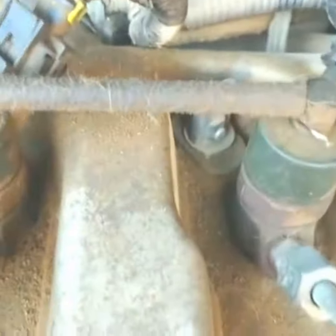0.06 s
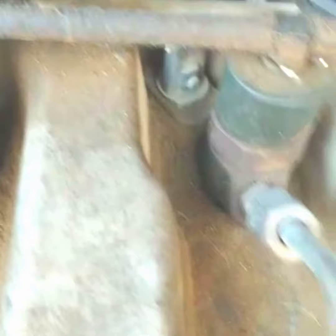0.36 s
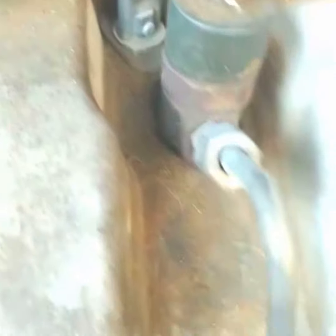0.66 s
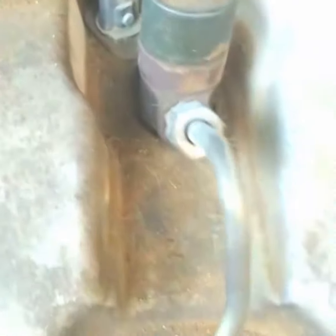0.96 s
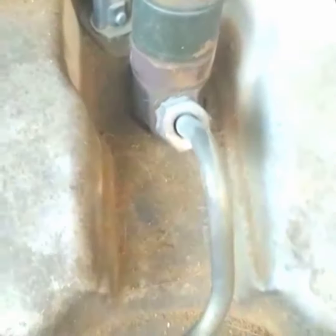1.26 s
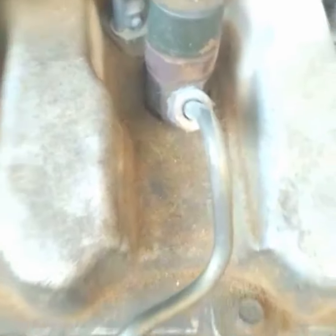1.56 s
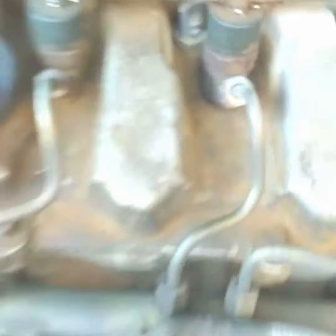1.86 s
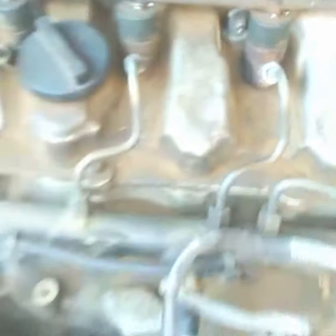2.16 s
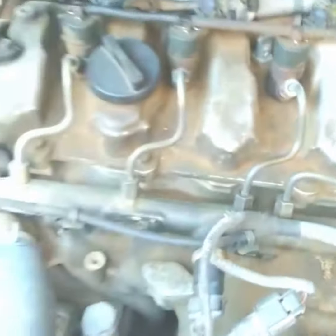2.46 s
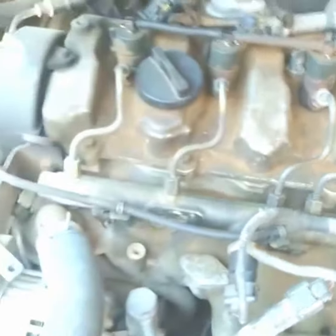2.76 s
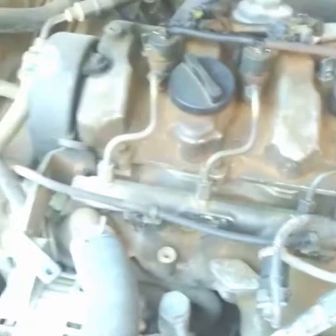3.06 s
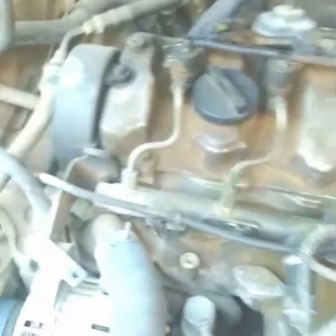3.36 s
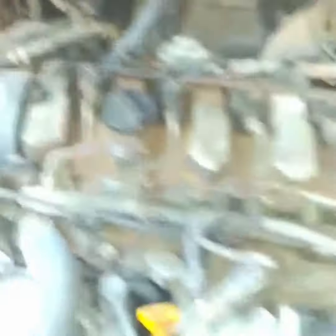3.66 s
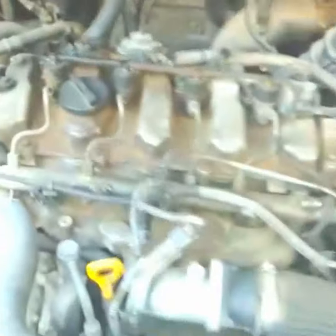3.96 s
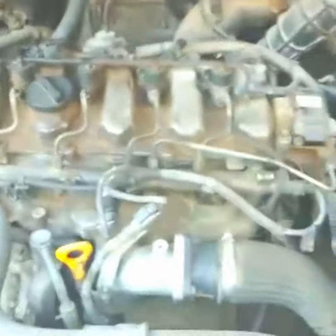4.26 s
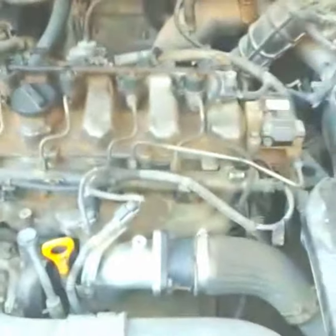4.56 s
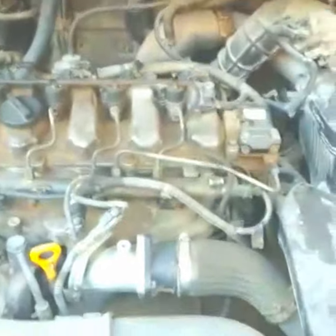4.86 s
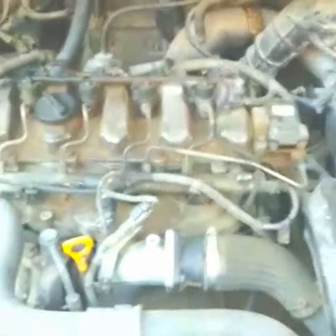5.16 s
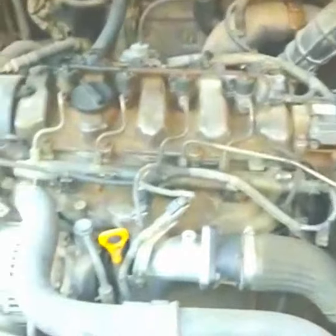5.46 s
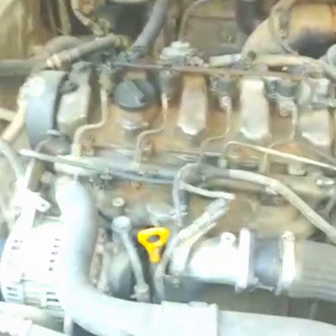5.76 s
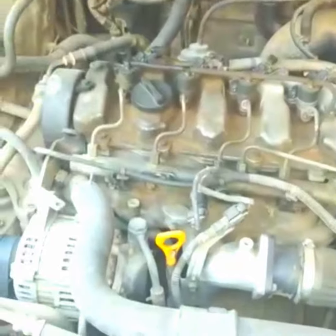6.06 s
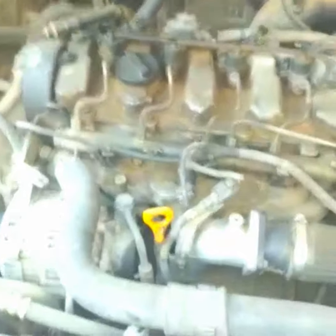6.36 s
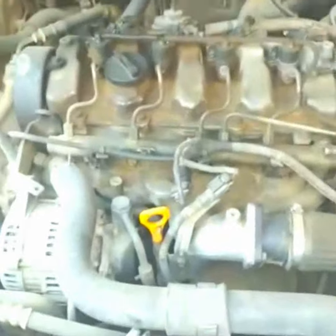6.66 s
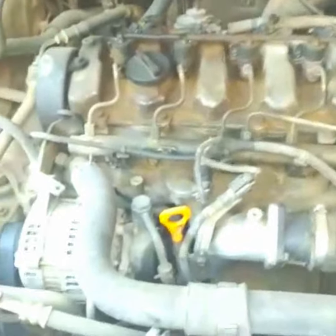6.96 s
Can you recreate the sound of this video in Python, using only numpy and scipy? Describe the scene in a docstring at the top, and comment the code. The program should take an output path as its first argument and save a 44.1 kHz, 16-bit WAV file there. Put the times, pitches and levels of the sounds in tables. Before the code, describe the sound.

A diesel car engine idles with a sharp, regular tapping knock, very close at first and then a little farther away.

```python
"""A four-cylinder diesel idles under an open bonnet, one cylinder knocking sharply once per cycle.
At first the microphone is right beside an injector, and the knocks overload it with low thumps.
After about two seconds it backs away: the thumps stop, and a little later two thin whistles fade.
From about five seconds on the knock is heard from afar. All along, the other three cylinders fire
between the knocks with a soft clatter, over the whirr of belts and gears and a low drone."""
import sys
import numpy as np
from scipy import signal
from scipy.io import wavfile
from scipy.ndimage import map_coordinates

SR = 44100
rng = np.random.default_rng(int(sys.argv[2]) if len(sys.argv) > 2 else 0)


def pcm_store(signal):
    """Save signal as 16-bit PCM."""
    levels = np.round(np.clip(np.atleast_2d(signal), -1, 1) * 32767)
    wavfile.write(sys.argv[1], SR, levels.astype(np.int16).T)


N = 308700
T = np.arange(N) / SR
FIRST_KNOCK_S, CYCLE_S = 0.0519, 0.153786   # one knock every two turns of the crank
# The bands in which the engine rings: octaves in the bass, thirds of an octave above.
BAND_EDGES_HZ = np.concatenate([[22, 45, 90], np.geomspace(180, 14400, 20)])

# The microphone's path. Each row: time in seconds, closeness to the cylinder head (0 far, 1 near).
CLOSENESS = [(.9, 0.91), (1.6, 0.87), (2.1, 0.65), (2.6, 0.32), (3.9, 0.25), (4.3, 0.09), (5.3, 0)]
# The four firings of a cycle. Each row: delay after the knock in seconds, strength in dB.
FIRINGS = [(-.003, 1), (0.0389, 1), (0.078, 0), (0.1133, 1)]
# The engine's tone colour. Each row: frequency in Hz, base levels of knock, clatter and whirr in dB,
# seconds for the ringing to fall by 60 dB.
ENGINE_SPECTRUM = [(29.6, -80, -71, -64.5, 0.2), (88.5, -65, -80, -80, 0.12), (183, -68.5, -60, -71, 0.21),
                   (280, -69, -90, -78, 0.09), (460, -70.5, -80.5, -77, 0.19), (827, -60, -67.5, -83, 0.15),
                   (1180, -59, -66.5, -90, 0.12), (1620, -55.5, -70.5, -86, 0.089),
                   (2330, -59, -74, -88.5, 0.091), (3290, -64, -75, -84, 0.066),
                   (5390, -48.5, -69, -82, 0.041), (8400, -42.5, -69.5, -80.5, 0.032),
                   (9470, -48.5, -78, -88, 0.031), (13900, -58.5, -78, -87, 0.023)]
# Extra level next to the head. Each row: frequency in Hz, dB for the knock, dB for clatter and whirr.
NEAR_BOOST = [(39.97, 8.5, 10), (189, 6, 4), (406, 9, 9.5), (890, 0.5, 2), (1730, 1.5, 10),
              (3570, 5.5, 9.5), (7430, -3, 7), (13100, 0.5, 11.5)]
# How much of the vibration is new in each cycle. Each row: frequency in Hz, share from 0 to 1.
FRESH_SHARE = [(40, 1), (90, 1), (180, 0.1), (600, 0.21), (1800, 0.09), (3500, 0.48), (8000, 0.91)]
# How wide the engine sounds. Each row: frequency in Hz, side (ear difference) minus mid (shared) in dB.
STEREO_WIDTH = [(60, -15), (110, -13), (200, -4.5), (380, -8.5), (700, -2.5), (1290, -2.5), (2380, -1),
                (4400, 1), (8120, 0), (15000, -1)]
# The balance between the ears. Each row: frequency in Hz, left minus right in dB.
BALANCE = [(60, -2), (400, 1), (1300, -2), (3000, 1), (6000, 0), (8200, 2), (10000, 7.5), (13000, 9.5)]
# The notes at which block, cover and injector ring. Each row: pitch in Hz, width in Hz,
# boost from afar in dB, boost next to the head in dB.
RESONANCES = [(282.5, 33, 11, -1.5), (318, 15, 2, 6.5), (401, 44, 0.5, 6), (476, 56, 3.5, 4.5),
              (665, 24, 7, 2.5), (820, 51, 2.5, 3.5), (914.4, 40, 4, 11.5), (1210, 15, 6.5, 5.5),
              (1473, 32, 7.5, 5), (1626, 32, 6, 5), (1765, 117, 11, 7.5), (1837, 58, -0.5, 3),
              (2347, 45, 10, 6), (2580, 63, 11, 4), (3368, 68, 11.5, 8.5), (5384, 103, -2.5, 3),
              (6154, 420, 3, 5.5), (8590, 1800, 5.5, 7.5)]
# Tones of block and intake that swell once a cycle. Each row: pitch in Hz, peak after the knock in
# seconds, half length in seconds, level from afar in dB, level next to the head in dB.
THROBS = [(179.5, 0.044, 0.032, -39.5, -39), (161.5, 0.0021, .017, -43, -39),
          (286, 0.01205, 0.018, -48, -54), (314, .025, 0.026, -66, -38), (415, 0.1, 0.011, -56, -40.5),
          (669, .028, 0.031, -48.5, -68)]
# The steady hum. Each row: multiple of the firing rate, level from afar in dB.
DRONE = [(1, -44), (2, -45), (4, -54)]
# Thin whistles over the injectors. Each row: pitch in Hz, width in Hz, base level in dB.
WHISTLES = [(11950, 220, -50), (12680, 160, -46.5)]
# How the whistles rise and fade. Each row: time in seconds, dB added to the base level.
WHISTLE_GAIN = [(.8, -16), (1.1, -6), (2.1, -1), (2.9, -8), (3.3, 1), (3.7, -12), (7, -13)]


def knock_blows(far_db, near_gain_db, scatter_db):
    """One blow per cycle, louder the nearer the microphone. Gives times and strengths in dB."""
    times = cycle_starts()
    scatter = scatter_db * rng.standard_normal(len(times))
    return times, far_db + near_gain_db * closeness_at(times) + scatter


def firing_energy(scatter_db):
    """Fuel burns in four bursts a cycle, each a little different in strength."""
    delay_s, level_db = np.transpose(FIRINGS)
    times = cycle_starts()[:, None] + delay_s
    strength = from_db(level_db + scatter_db * rng.standard_normal(times.shape))
    return impulses(times.ravel(), strength.ravel() ** 2)


def knock_clatter_and_whirr(blows, closeness, knock_rise_periods, firing_rise_s, bay_db, bay_stretch,
                            standing_wave_db, echo_s, echo_db):
    """Blows set the metal ringing over a steady whirr; a knock's low notes build later and last longer."""
    times, strength_db = blows
    knocks = impulses(times, from_db(strength_db) ** 2)
    knocks += impulses(times + echo_s, from_db(strength_db + echo_db) ** 2)   # echo off the bonnet
    firings = firing_energy(scatter_db=1.53)
    # Neighbouring bands take turns between two sets of noise.
    repeating = [repeating_noise(closeness, turns=0.66) for _ in range(2)]
    fresh = rng.standard_normal((2, 2, N))
    out = np.zeros((2, N))
    for k, (low, high) in enumerate(zip(BAND_EDGES_HZ, BAND_EDGES_HZ[1:])):
        hz = np.sqrt(low * high)
        knock_db, clatter_db, whirr_db, ring_s = at_hz(ENGINE_SPECTRUM, hz)
        near_knock_db, near_rest_db = at_hz(NEAR_BOOST, hz)
        fall_s = energy_fall_s(ring_s)
        knock = swell(knocks, knock_rise_periods / hz, fall_s)
        # The walls of the engine bay return a longer tail.
        knock += from_db(bay_db) ** 2 * swell(knocks, fall_s, bay_stretch * fall_s)
        knock *= from_db(knock_db + near_knock_db * closeness) ** 2
        clatter = swell(firings, firing_rise_s, fall_s) * from_db(clatter_db) ** 2
        clatter_and_whirr = (clatter + from_db(whirr_db) ** 2) * from_db(near_rest_db * closeness) ** 2
        loudness = np.sqrt((knock + clatter_and_whirr) * SR / 2)
        loudness *= from_db(standing_wave_db * wander(rate_hz=2.33))   # passing loud and quiet spots
        share = at_hz(FRESH_SHARE, hz)[0]
        noise = np.sqrt(1 - share) * repeating[k % 2] + np.sqrt(share) * fresh[k % 2]
        mid, side = signal.sosfilt(signal.butter(2, [low, high], "band", fs=SR, output="sos"), noise)
        width, balance_db = from_db(at_hz(STEREO_WIDTH, hz)[0]), at_hz(BALANCE, hz)[0]
        ears = np.array([mid + width * side, mid - width * side]) / np.hypot(1, width)
        out += ears * from_db([[balance_db / 2], [-balance_db / 2]]) * loudness
    return out


def repeating_noise(closeness, turns):
    """The same dense ringing follows every knock, shifting with time and as the microphone moves."""
    starts = np.round(cycle_starts() * SR).astype(int)
    cycle = np.searchsorted(starts, np.arange(N), side="right") - 1
    age = np.arange(N) - starts[cycle]
    first, second = rng.standard_normal((2, 2, age.max() + 1))   # each has a mid and a side row
    blend = 2 * np.pi * (turns * closeness + .12 * T)
    return np.cos(blend) * first[:, age] + np.sin(blend) * second[:, age]


def head_resonances(ringing, blows, closeness, over_head_from, direct_share, travel_s, wander_db):
    """Knocks and dense ringing stir the metal's strong notes; each is heard best from its own place."""
    times, strength_db = blows
    over_head = np.clip(closeness / over_head_from, 0, 1)   # 0 facing the engine's front, 1 above it
    out = ringing
    for hz, width_hz, far_db, near_db in RESONANCES:
        knock_db, _, _, ring_s = at_hz(ENGINE_SPECTRUM, hz)
        # The blow reaches each part a little later, with the knock's energy at this pitch.
        hits = impulses(times + rng.uniform(0, travel_s), from_db(strength_db))
        hits *= from_db(knock_db + at_hz(NEAR_BOOST, hz)[0] * closeness)
        hits *= SR * np.sqrt(energy_fall_s(ring_s) / 2)
        pan = np.pi / 4 + rng.uniform(-1, 1) * np.arctan(from_db(at_hz(STEREO_WIDTH, hz)[0]))
        ears = np.sqrt(2) * np.array([[np.cos(pan)], [np.sin(pan)]])
        drive = np.sqrt(direct_share) * ears * hits + np.sqrt(1 - direct_share) * ringing
        spots_db = wander_db * wander(rate_hz=1.77)   # each note has its own quiet spots in the air
        boost = from_db(far_db + (near_db - far_db) * over_head + spots_db)
        out = out + (boost - 1) * signal.lfilter(*signal.iirpeak(hz, hz / width_hz, fs=SR), drive)
    return out


def cover_reflection(sound, lag_s, sway_s, level_db):
    """The cam cover throws the sound back a moment later; as the hand sways, the tone colour changes."""
    gain = from_db(level_db)
    echo = [map_coordinates(ear, [(T - lag_s - sway_s * wander(rate_hz=2.2)) * SR], order=3)
            for ear in sound]
    return (sound + gain * np.array(echo)) / np.hypot(1, gain)


def overload_thumps(blows, threshold_db, knee_db, level_db, scatter_db, rise_s, fall_s, recovery_hz):
    """A very loud knock jolts the left microphone off centre; it sinks back with a low thump."""
    times, strength_db = blows
    overload = np.clip((strength_db - threshold_db) / knee_db, 0, 1)
    direction = rng.choice([-1, 1], len(times))
    size = from_db(level_db + scatter_db * rng.uniform(-0.83, 1, len(times)))
    offset = swell(impulses(times, overload * direction * size), rise_s, fall_s)
    left = signal.sosfilt(signal.butter(1, recovery_hz, "high", fs=SR, output="sos"), offset)
    return np.array([left, np.zeros(N)])


def throbs(closeness, waver_db):
    """Each low tone of block and intake swells and fades at its own point of the cycle."""
    out = 0
    for hz, peak_s, half_s, far_db, near_db in THROBS:
        from_peak_s = (T - FIRST_KNOCK_S - peak_s + CYCLE_S / 2) % CYCLE_S - CYCLE_S / 2
        level = from_db(far_db + (near_db - far_db) * closeness + waver_db * wander(rate_hz=5))
        bump = np.exp(-(from_peak_s / half_s) ** 2)
        out = out + level * bump * np.sqrt(2) * np.cos(2 * np.pi * hz * from_peak_s)
    return out


def drone(closeness, lag_s, near_db):
    """The firings come so fast that they hum, at their own rate and its multiples."""
    phase = 2 * np.pi * len(FIRINGS) * (T - FIRST_KNOCK_S - lag_s) / CYCLE_S
    hum = sum(from_db(db) * np.cos(multiple * phase) for multiple, db in DRONE)
    return np.sqrt(2) * hum * from_db(near_db * closeness)


def whistles():
    """Bands of hiss so narrow that they whistle, separate in each ear."""
    out = 0
    for hz, width_hz, level_db in WHISTLES:
        peak = signal.iirpeak(hz, hz / width_hz, fs=SR)
        band = signal.lfilter(*peak, signal.lfilter(*peak, rng.standard_normal((2, N))))
        out = out + from_db(level_db) * band / band.std()
    return out * from_db(np.interp(T, *np.transpose(WHISTLE_GAIN)))


def cycle_starts():
    """Knock times in seconds, with one more cycle at either end."""
    return FIRST_KNOCK_S + CYCLE_S * np.arange(-1, N / SR / CYCLE_S + 1)


def closeness_at(times):
    """How near the microphone is to the cylinder head, from 0 to 1."""
    return np.interp(times, *np.transpose(CLOSENESS))


def impulses(times, heights):
    """A row of blows, each one sample long."""
    out = np.zeros(N)
    at = np.round(times * SR).astype(int)
    inside = (at >= 0) & (at < N)
    np.add.at(out, at[inside], heights[inside])
    return out


def swell(blows, rise_s, fall_s):
    """Makes each blow build up and die away smoothly."""
    up, down = np.exp(-1 / (rise_s * SR)), np.exp(-1 / (fall_s * SR))
    fading = signal.lfilter([1], [1, -down], blows + 1e-18)
    return signal.lfilter([1 - up], [1, -up], fading)


def energy_fall_s(ring_s):
    """Turns the time a ring takes to fall by 60 dB into the time its energy takes to fall to 37%."""
    return ring_s / np.log(1e6)


def wander(rate_hz):
    """A slow random curve that mostly stays between -1 and 1."""
    knots = rng.standard_normal(64)
    curve = map_coordinates(knots, [T[::100] * rate_hz], order=3, mode="wrap")
    return curve[np.arange(N) // 100]


def at_hz(rows, hz):
    """Reads a table's values at one frequency, blending between rows."""
    freqs, *columns = np.transpose(rows)
    return [np.interp(np.log(hz), np.log(freqs), column) for column in columns]


def from_db(db):
    """Turns decibels into a number to multiply by."""
    return 10 ** (np.asarray(db) / 20)


def scene():
    """The engine bay as the microphone backs away from the cylinder head."""
    closeness = closeness_at(T)
    blows = knock_blows(far_db=-0.49, near_gain_db=6.5, scatter_db=0.84)
    metal = knock_clatter_and_whirr(blows, closeness, knock_rise_periods=1.7, firing_rise_s=0.0036,
                                    bay_db=-17, bay_stretch=2.82, standing_wave_db=0.65,
                                    echo_s=0.0044, echo_db=-9.0)
    metal = head_resonances(metal, blows, closeness, over_head_from=0.39, direct_share=0.61,
                            travel_s=.004, wander_db=1.67)
    metal = cover_reflection(metal, lag_s=.0022, sway_s=.0005, level_db=-10)
    hum = throbs(closeness, waver_db=1.0) + drone(closeness, lag_s=.032, near_db=-1.0)
    thumps = overload_thumps(blows, threshold_db=3.5, knee_db=1.0, level_db=-14.5, scatter_db=3,
                             rise_s=0.0015, fall_s=0.034, recovery_hz=2.6)
    return metal + thumps + hum + whistles()


def record(dry):
    """Cuts the highest treble, squashes the loudest knocks, then cuts the treble the squashing adds."""
    band = signal.sosfilt(signal.ellip(8, .2, 60, 14150, fs=SR, output="sos"), dry)
    clipped = band / (1 + np.abs(band / 1.02) ** 8) ** (1 / 8)
    return signal.sosfiltfilt(signal.ellip(10, .05, 60, 15600, fs=SR, output="sos"), clipped)


dry = scene()
out = record(dry)
pcm_store(out)
```